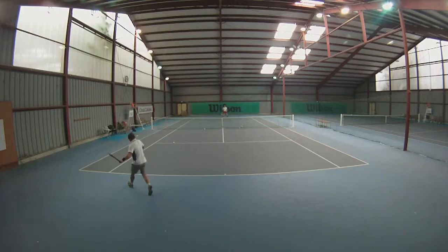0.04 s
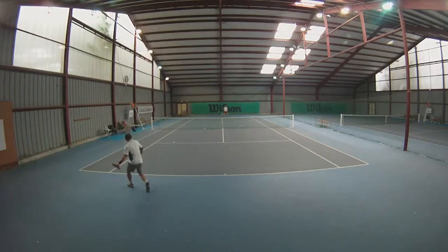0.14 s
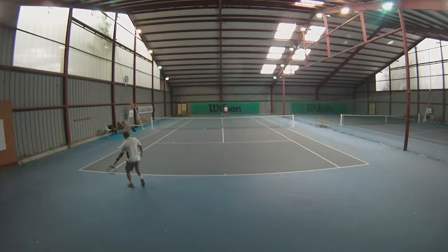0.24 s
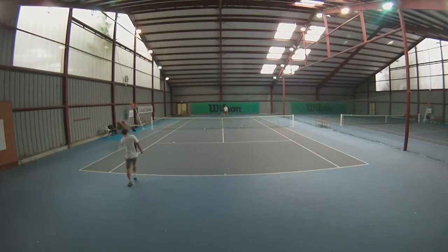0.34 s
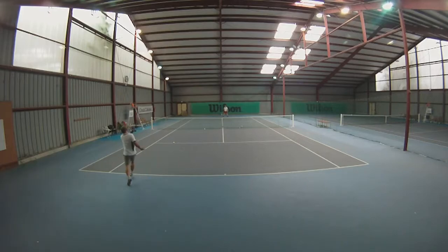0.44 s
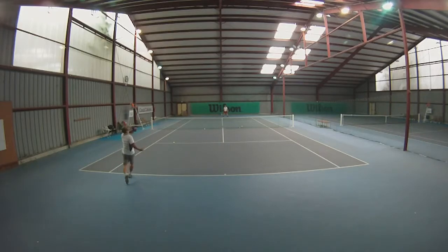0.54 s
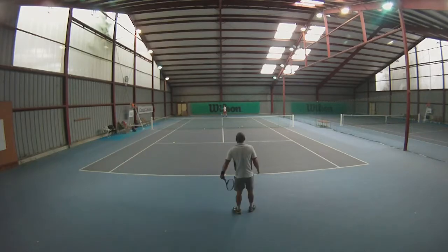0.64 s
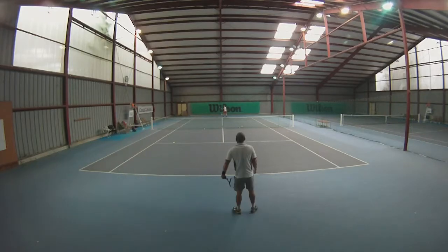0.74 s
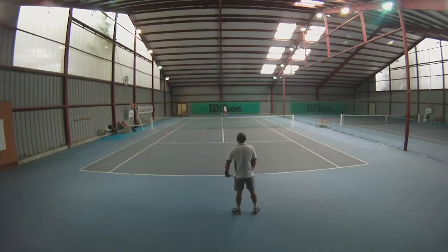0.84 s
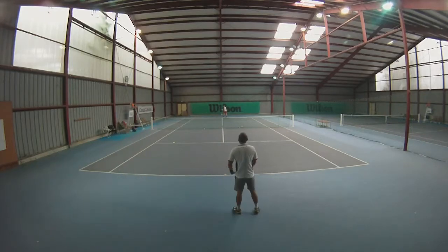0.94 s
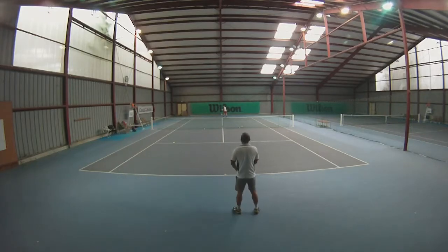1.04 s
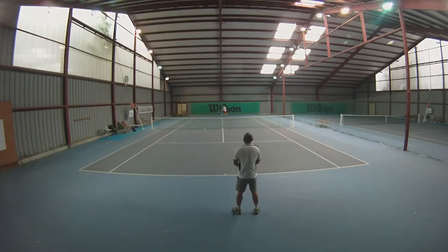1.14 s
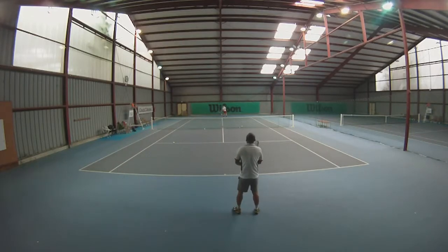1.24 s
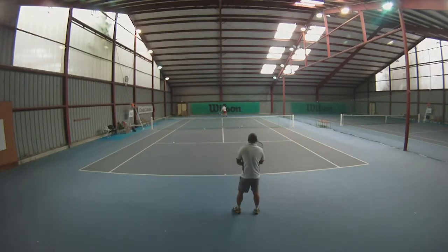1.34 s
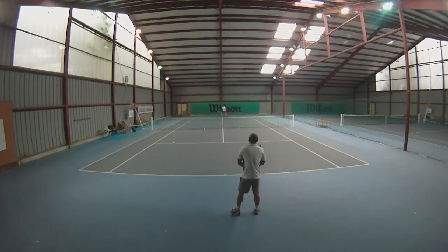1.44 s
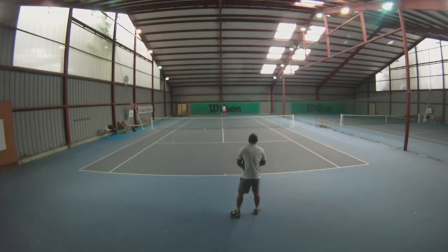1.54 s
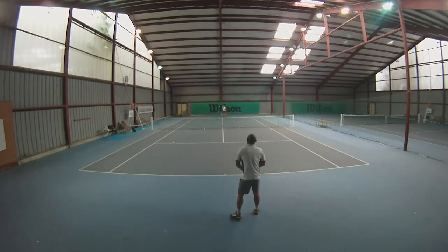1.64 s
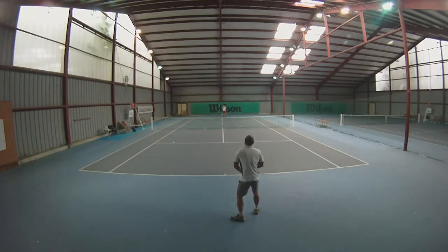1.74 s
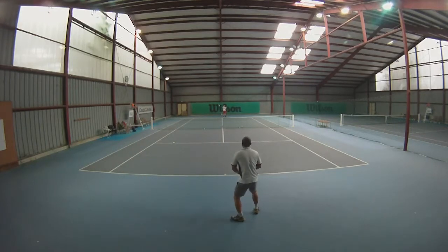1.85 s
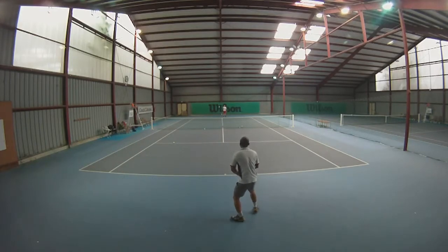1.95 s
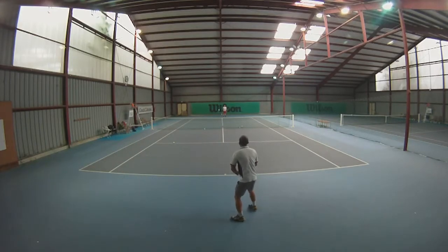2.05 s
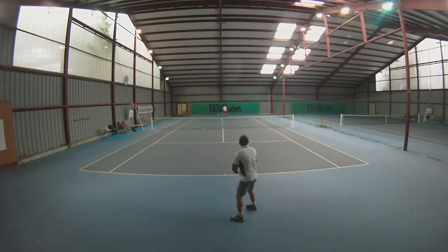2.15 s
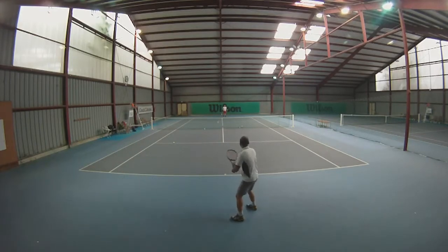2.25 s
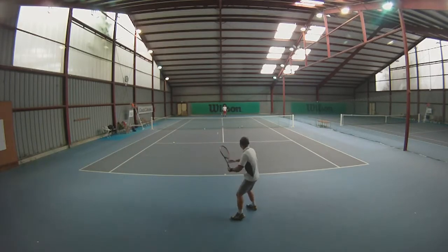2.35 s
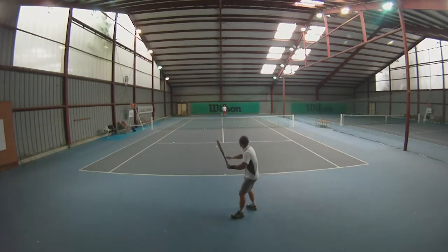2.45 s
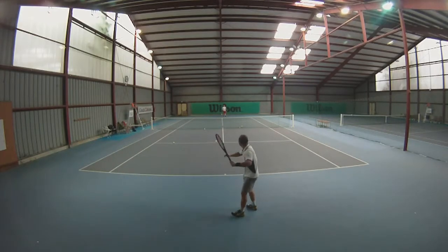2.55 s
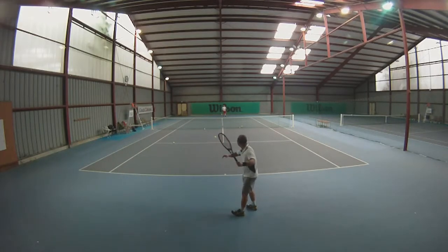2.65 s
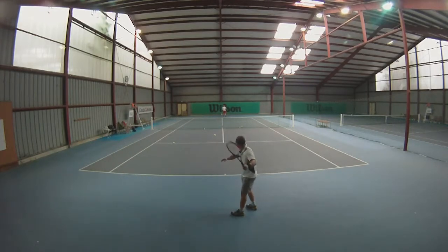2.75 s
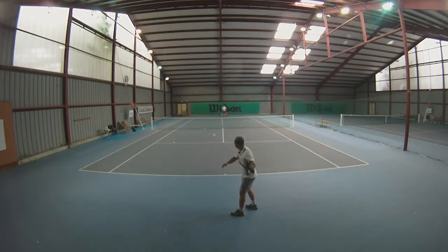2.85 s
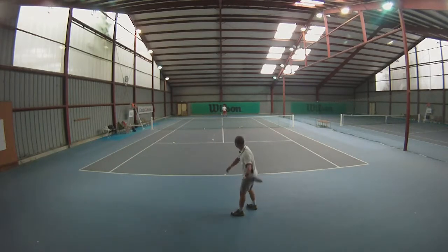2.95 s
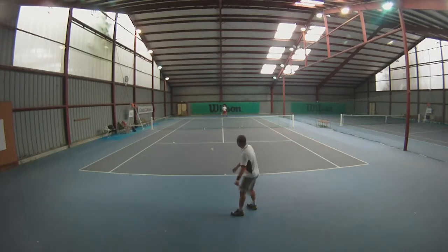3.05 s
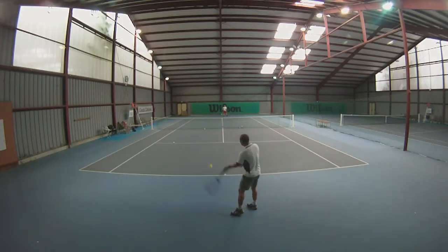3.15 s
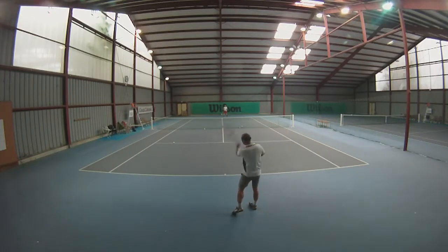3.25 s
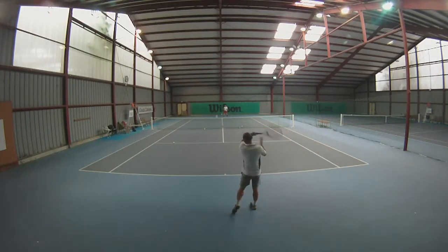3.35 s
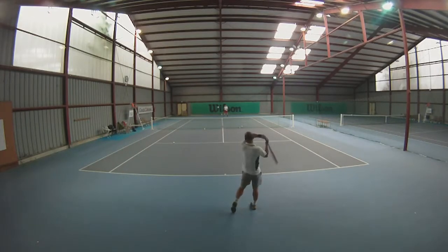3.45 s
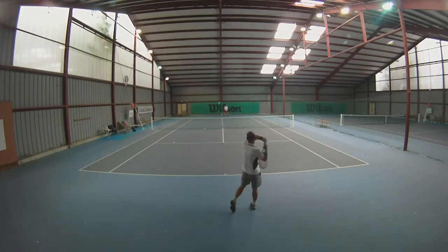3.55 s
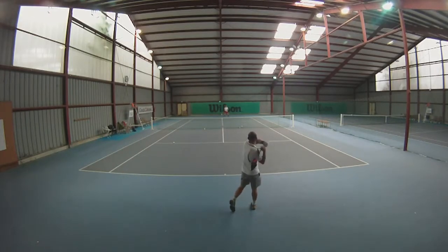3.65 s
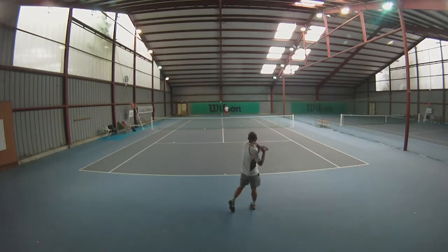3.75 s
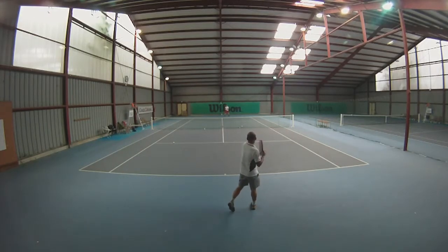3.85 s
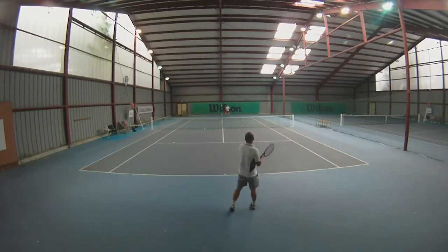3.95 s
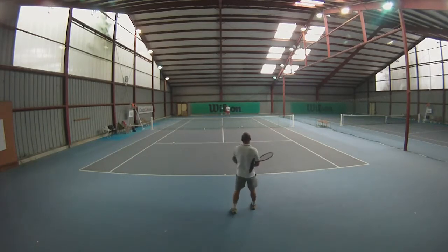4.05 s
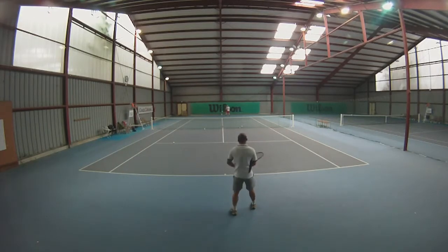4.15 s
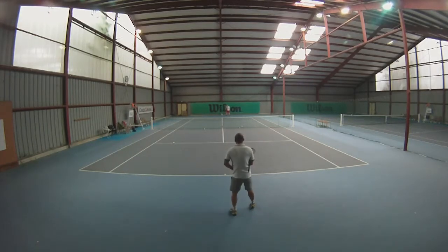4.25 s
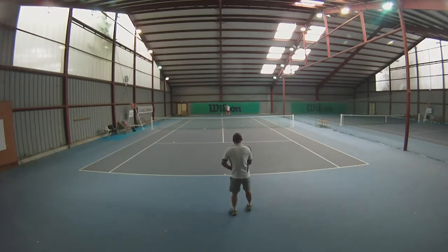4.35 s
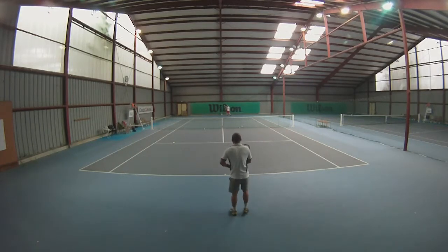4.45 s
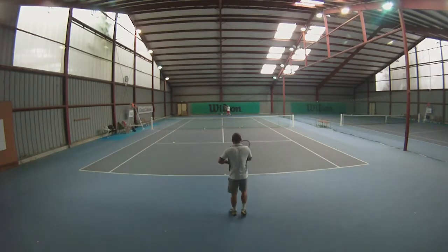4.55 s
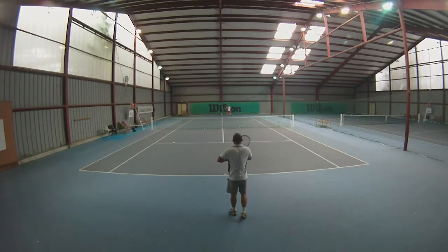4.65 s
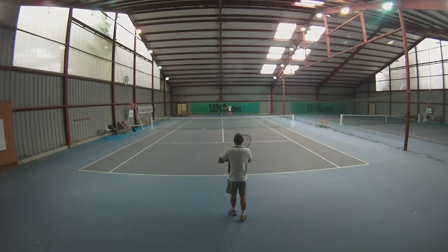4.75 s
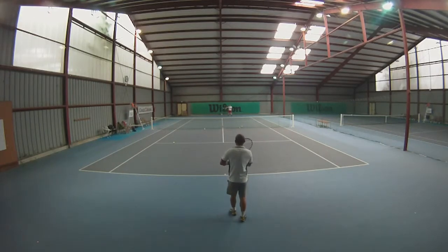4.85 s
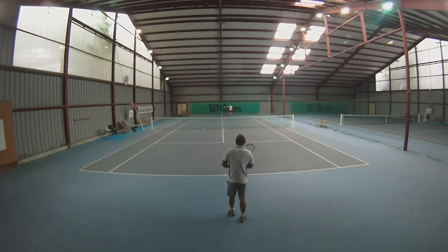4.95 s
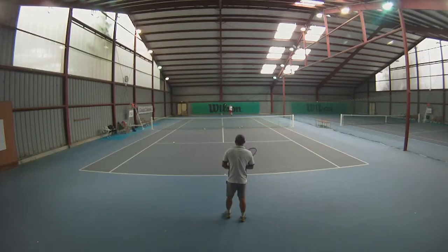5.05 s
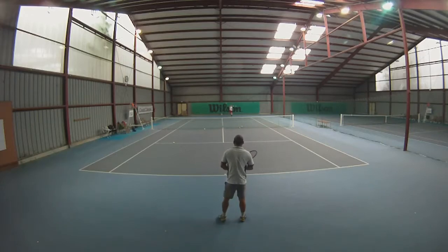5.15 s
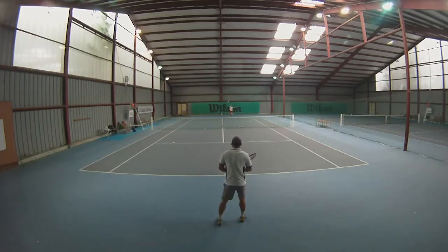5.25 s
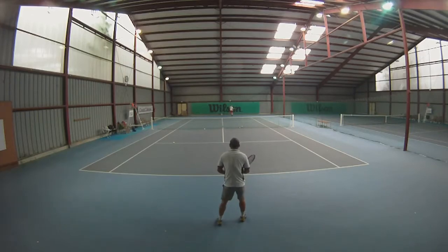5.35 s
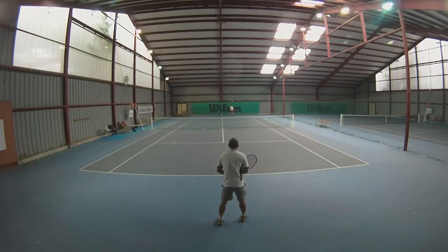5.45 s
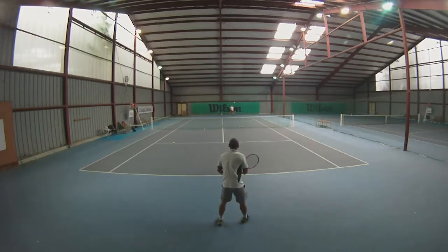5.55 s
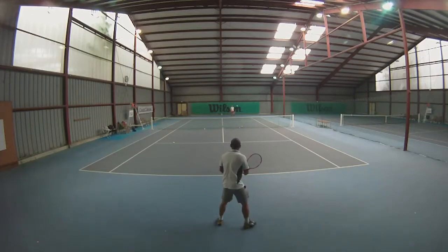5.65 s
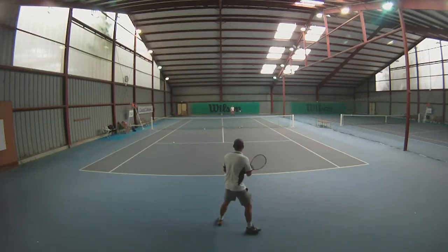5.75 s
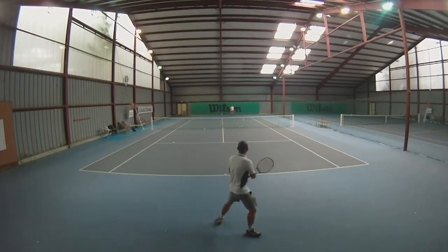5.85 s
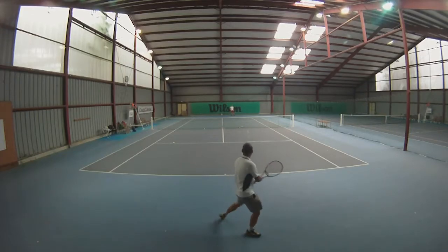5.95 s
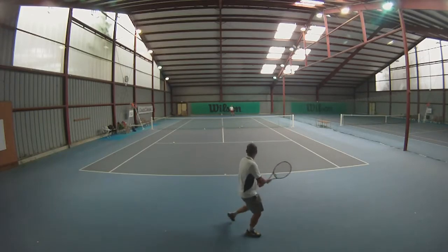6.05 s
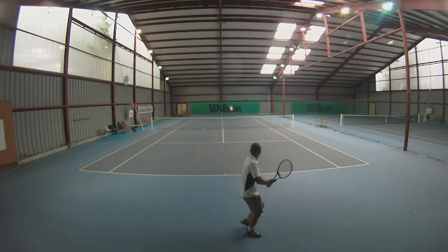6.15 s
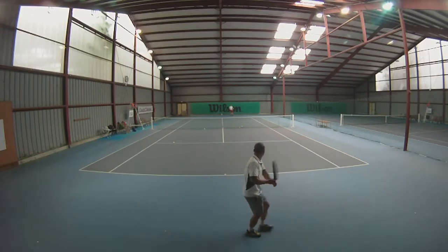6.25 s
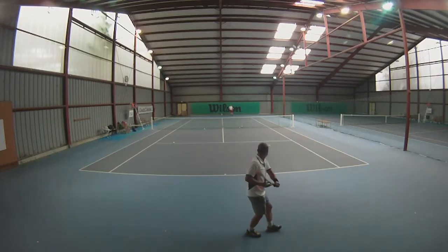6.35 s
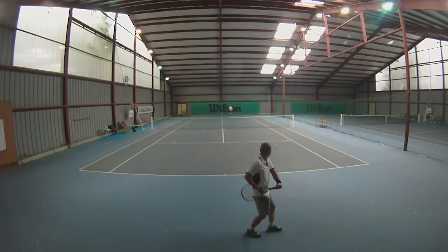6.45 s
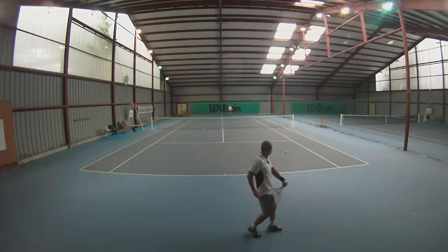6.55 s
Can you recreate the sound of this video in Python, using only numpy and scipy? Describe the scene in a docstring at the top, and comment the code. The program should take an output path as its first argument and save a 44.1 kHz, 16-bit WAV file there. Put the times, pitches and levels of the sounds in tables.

```python
"""Tennis in a steel-clad hall

Two rallies heard from behind the near baseline, one scene after the other; the first breaks off abruptly, tails
and all, as the scene changes. Balls and rackets are sets of fading tones with short bursts of noise; shoes are
shaped noise that taps and scuffs. Delayed copies make the echoes of ribbed walls, and fading noise makes the
hall ring for about three seconds. The nearly mono sound is sampled at 12 kHz and each sample is held, which
makes the treble gritty."""
import sys
import numpy as np
from scipy import signal
from scipy.fft import rfft, irfft, next_fast_len
from scipy.io import wavfile

SR = 44100
rng = np.random.default_rng(int(sys.argv[2]) if len(sys.argv) > 2 else 0)


def unload_wav(signal):
    """Save mono or channel-first audio to the path in sys.argv[1] as 16-bit WAV at rate SR, clipped to [-1, 1]."""
    wavfile.write(
        sys.argv[1],
        SR,
        np.round(np.clip(np.atleast_2d(signal).T, -1, 1) * 32767).astype(np.int16),
    )


N = 291060
TIME = np.arange(N) / SR
SHORT, LONG = TIME[:SR // 8], TIME[:3 * SR]  # time axes for hits (1/8 s) and for tails (3 s)
NET_M = 17  # anything farther away than this lies beyond the net

# echoes of the walls close by: lag/s, level/dB (a wall setting is added later)
CLOSE_WALLS = [(.0073, -24.5), (.012, -24.5), (.025, -21)]
# echoes of the walls round the far player: lag/s, level/dB (a wall setting is added later)
FAR_WALLS = [(0.0158, -4.5), (0.029, -1), (.089, -6.5)]
# tone colour of bounces and steps spread through the hall: f/Hz, relative level per Hz/dB
BOUNCE_COLOUR = [(60, -23), (180, 2), (300, 5), (450, -11), (720, -17), (1020, -8.5), (1550, -12),
                 (2200, -10.5), (2900, -14), (3600, -27.5), (6000, -43)]


def amp(db):
    """Turn decibels into a gain."""
    return 10 ** (np.asarray(db) / 20)


def unit(x):
    """Scale to an rms (average strength) of 1."""
    return x / np.sqrt(np.mean(x ** 2) + 1e-20)


def along(points, hz):
    """Read between (Hz, value) points on a logarithmic pitch axis."""
    f, v = np.transpose(points)
    return np.interp(np.log(hz + 1), np.log(f + 1), v)


def fade(t, t60):
    """Die away steadily, by 60 dB in t60 seconds."""
    return np.exp(-np.log(1000) * t / t60)


def filtered(x, response):
    """Multiply each frequency of x by the response there."""
    size = next_fast_len(x.shape[-1] + 8192)  # room for the filter to ring out
    hz = np.fft.rfftfreq(size, 1 / SR)
    return irfft(rfft(x, size) * response(hz), size)[..., :x.shape[-1]]


def dulled(x, edge_hz):
    """Remove the treble above an edge, as a low-pass that never sounds ahead of its input."""
    return signal.sosfilt(signal.butter(4, edge_hz / (SR / 2), output="sos"), x)


def noise(t, response):
    """Make coloured noise of rms 1, as long as t."""
    return unit(filtered(rng.standard_normal(len(t)), response))


def band(centre_hz, width_hz):
    """Give the response of a resonance; width_hz is where it falls to half its height."""
    return lambda hz: 1 / (1 + ((hz - centre_hz) / width_hz * 2) ** 2)


def add(track, s, sound):
    """Mix a sound into a track at time s, dropping what lies outside."""
    start = round(s * SR)
    sound, start = sound[max(-start, 0):], max(start, 0)
    track[start:start + len(sound)] += sound[:max(len(track) - start, 0)]


def ring(modes):
    """Let an object vibrate in several fading tones, all struck together."""
    return sum(amp(db) * fade(SHORT, t60) * np.sin(2 * np.pi * hz * SHORT) for hz, db, t60 in modes)


def crack(t60):
    """A surface is slapped: a short burst of coloured noise."""
    # colour of the slap: f/Hz, relative level per Hz/dB
    crack_colour = [(100, 15), (800, 14), (2600, 3.5), (3700, -24), (4700, -5), (6000, -56)]
    return noise(SHORT, lambda hz: amp(along(crack_colour, hz))) * fade(SHORT, t60)


def echoes(sound, walls, walls_db, rib_hz=230):
    """Direct sound and its echoes; ribbed sheet steel throws back little bass."""
    thin = filtered(sound, lambda hz: 1j * hz / (rib_hz + 1j * hz))
    out = np.zeros(len(LONG))
    add(out, 0, sound)
    for lag, db in walls:
        add(out, lag, amp(db + walls_db) * thin)
    return out


def hall(colour, early_db, late_db, tilt_db, early_t60=0.16, build_s=0.026, surge_s=0.013):
    """Sound scattered all over the hall: a quick early cloud, then a long surging tail."""
    # surges of scattered sound from roof and gables: lag/s, level in the bass/dB
    surges = [(.115, -1.5), (0.201, 0), (.25, 4), (.42, 2.5)]
    # how long the hall rings at each pitch: f/Hz, t60/s
    hall_decay = [(100, 2.03), (300, 2.79), (900, 2.47), (2000, 3.21), (3000, 4.4), (5000, 2.77)]

    def tilted(hz):
        tilt = tilt_db * np.log2((hz + 50) / 500)  # dB per octave, gentler in the deep bass
        return amp(along(colour, hz) + tilt)

    # split the noise into short slices, so that every pitch can fade at its own pace
    hz, t, slices = signal.stft(noise(LONG, tilted), SR, nperseg=512)
    surge_db = sum(db * np.exp(-((t - lag) / surge_s) ** 2) for lag, db in surges)
    # surges are strongest in the bass; the treble is scattered evenly
    surge_db = surge_db / (1 + (hz[:, None] / 1500) ** 2)
    decay = fade(t, along(hall_decay, hz)[:, None])
    tail = signal.istft(slices * amp(surge_db) * decay, SR, nperseg=512)[1][:len(LONG)]
    level = np.hypot(amp(late_db), amp(early_db) * fade(LONG, early_t60))
    return tail * level * (1 - np.exp(-LONG / build_s))


def air(rumble_db=-50, hum_hz=100, hum_db=-58):
    """The quiet hall: low rumble as coloured noise, and the hum of its lamps as a steady tone."""
    # colour of the quiet hall: f/Hz, relative level per Hz/dB
    air_colour = [(12, -14), (20, -18), (49, 0.5), (137, -8.5), (161, -14), (379, -19), (417, -22),
                  (469, -18.5), (654, -25.5), (1430, -32.5), (2650, -32), (2990, -30.5), (3280, -36.5),
                  (5150, -39), (5800, -47.5), (7540, -83), (12800, -120)]
    rumble = amp(rumble_db) * noise(TIME, lambda hz: amp(along(air_colour, hz)))
    return rumble + amp(hum_db) * np.sin(2 * np.pi * hum_hz * TIME)


def bounces(thump_hz=265, thump_t60=0.028, thump_db=-2.5, felt_hz=3000,
            near_walls_db=11.0, far_walls_db=2.0, early_db=-35, late_db=-43.5, boom_hz=150, boom_db=-21):
    """The hollow ball knocks on the hard court: its shell clicks, its body thumps and a low boom follows."""
    # ball bounces: t/s, distance/m, strength at 1 m/dB; one before 0 leaves only its tail
    landings = [(-0.3, 7.5, -3), (2.5433, 7.1, -3.5), (4.5084, 28, -1), (6.1831, 5.6, -1)]
    # tones of the ball's shell on the court: f/Hz, level/dB, t60/s
    shell = [(1066, -17.5, 0.052), (1280, -6.5, 0.011), (1840, -2.5, 0.0027), (2600, -11.5, 0.0042)]
    for s, metres, db in landings:
        thump = amp(thump_db) * np.cos(2 * np.pi * thump_hz * SHORT)
        thump = thump * fade(SHORT, thump_t60) * (1 - fade(SHORT, 0.0036))
        knock = dulled(ring(shell) + thump, felt_hz) + amp(-14) * crack(t60=0.026)
        if metres > NET_M:
            sound = echoes(knock, FAR_WALLS, far_walls_db)
        else:
            sound = echoes(knock, CLOSE_WALLS, near_walls_db)
        boom = amp(boom_db) * noise(LONG, band(boom_hz, width_hz=160))
        boom = boom * fade(LONG, 0.37) * (1 - fade(LONG, 0.067))
        answer = hall(BOUNCE_COLOUR, early_db, late_db, tilt_db=0, early_t60=0.19, build_s=0.009)
        # direct sound weakens with distance; the hall's answer depends on strength alone
        yield s, amp(db) * ((sound + boom) / metres + answer)


def steps(thud_hz=340, early_db=-12, late_db=-20):
    """A shoe lands with a soft thud and a slap of noise; the hall's answer follows the thud's strength."""
    # footfalls, levels before the fades: t/s, thud level/dB, slap level/dB
    footfalls = [(0.100, -34.5, -51), (2.395, -42, -58), (2.8, -31.5, -50), (4.665, -37, -40),
                 (6.477, -34, -37.5)]
    for s, thud_db, slap_db in footfalls:
        thud = noise(SHORT, band(thud_hz, width_hz=250)) * fade(SHORT, 0.035) * (1 - fade(SHORT, 0.012))
        sound = hall(BOUNCE_COLOUR, thud_db + early_db, thud_db + late_db, tilt_db=0.5)
        add(sound, 0, amp(thud_db) * thud + amp(slap_db) * crack(t60=0.021))
        yield s, sound


def scuffs(width_share=0.3):
    """Rubber soles chirp and hiss as they slide; the higher the chirp, the wider its band of noise."""
    # soles rubbing the court: middle t/s, swell time each side/s, f/Hz, peak level/dB
    rubs = [(0.259, 0.089, 4400, -64.5), (0.388, 0.026, 2650, -57), (0.923, 0.024, 2770, -56.5),
            (1.814, 0.063, 4300, -61.5), (5.286, 0.011, 2800, -34.5), (6.417, 0.018, 5030, -60)]
    for s, length, hz, db in rubs:
        swell = np.exp(-((LONG - 2 * length) / length) ** 2)
        yield s - 2 * length, amp(db) * swell * noise(LONG, band(hz, width_share * hz))


def strokes(pop_hz=420, dwell_s=0.00321, pop_width_s=0.0021, ping_t60=2.75, near_hz=6500, far_hz=3000,
            near_ratio=1.06, far_ratio=0.98, near_walls_db=-7.0, far_walls_db=0.8, hall_db=-40):
    """The ball sinks into the strings and is thrown out: one pop, then strings and frame ring."""
    # racket strokes: t/s, distance/m, strength at 1 m/dB, off centre/0-1,
    # early cloud over the tail/dB, ping f/Hz, ping over strength/dB
    swings = [(0.413, 11.8, 12.5, 0.77, 7, 2700, -68), (1.5287, 23.7, 4, 0.07, 4.5, 3250, -62),
              (3.2613, 4.07, 12.5, 0, -14, 2740, -63), (5.0799, 23.6, 11.5, 0.54, 0, 2030, -47.5)]
    # tones of strings and frame: f/Hz, level struck in the centre/dB, level struck off centre/dB, t60/s
    racket = [(292, -28, 2, 0.04), (425, -17, -10, 0.046), (565, -9.5, -1.5, 0.033),
              (702, -24, -2.5, 0.074), (882, -9, -3, 0.039), (1364, -19.5, -16, 0.03),
              (1593, -41, -11, 0.14), (2030, -34, -24, 0.028), (2344, -17, -9, 0.036),
              (2467, -51, -4.5, 0.029), (2913, -17.5, -33, 0.025), (3090, -19, -39, 0.021),
              (4480, -26, -11.5, 0.015)]
    # echoes of the far wall for the near player: lag/s, level/dB (a wall setting is added below)
    late_walls = [(.038, -30), (.19, -14.5), (.245, -18), (0.408, -21)]
    # tone colour of strokes spread through the hall: f/Hz, relative level per Hz/dB
    stroke_colour = [(50, -17), (130, -10), (230, 0), (320, 4), (400, -2.5), (520, -4.5), (710, -18.5),
                     (890, -6), (1030, -12), (1200, -19.5), (2000, -20.5), (2850, -20), (3600, -32.5),
                     (4750, -31.5), (6000, -47.5)]
    court_lag_s, court_graze_m = 0.00363, 20  # the court's echo: lag, and distance where it is half as strong
    # a clean stroke's felt crack and the tilt of its tail per octave
    crack_db, clean_tilt_db = -15, 0.03
    # added at the edge of the strings: a higher pop, a harder crack and a brighter tail
    off_pitch_rise, off_crack_db, off_tilt_db = 0.22, 11, 1.07
    for s, metres, db, off, cloud_db, ping_hz, ping_db in swings:
        # each player has a racket of their own and other walls around them
        if metres > NET_M:
            ratio, edge_hz, walls, walls_db = far_ratio, far_hz, FAR_WALLS, far_walls_db
        else:
            ratio, edge_hz, walls, walls_db = near_ratio, near_hz, CLOSE_WALLS + late_walls, near_walls_db
        pitch_hz = pop_hz * ratio * (1 + off_pitch_rise * off)
        since_pop = SHORT - dwell_s
        pop = np.exp(-(since_pop / pop_width_s) ** 2) * np.cos(2 * np.pi * pitch_hz * since_pop)
        # an off-centre contact wakes other tones than a clean one
        strings = ring([(hz, np.interp(off, [0, 1], [centre_db, edge_db]), t60)
                        for hz, centre_db, edge_db, t60 in racket])
        felt = amp(crack_db + off_crack_db * off) * crack(t60=0.042)
        # the force builds up as the ball is squeezed
        contact = pop + (strings + felt) * (1 - fade(SHORT, 0.0064))
        hit = dulled(amp(db) / metres * contact, edge_hz)
        sound = echoes(hit, walls, walls_db)
        add(sound, court_lag_s, metres / (metres + court_graze_m) * hit)
        # the racket's ping lingers in the hall as a narrow, wavering band of noise
        ping = amp(db + ping_db) * noise(LONG, band(ping_hz, width_hz=173))
        ping = ping * fade(LONG, ping_t60) * (1 - fade(LONG, 0.09))
        late_db = db + hall_db
        tilt_db = clean_tilt_db + off_tilt_db * off
        answer = hall(stroke_colour, late_db + cloud_db, late_db, tilt_db, early_t60=0.34, build_s=0.0038)
        yield s, sound + ping + answer


def widen(mono):
    """Make two nearly alike channels by adding a scattered copy to one and taking it from the other."""
    # gain of the scattered difference between the channels: f/Hz, level/dB
    width = [(100, -36.5), (450, -44), (1000, -45), (2500, -31), (4500, -48)]
    scatter = rng.standard_normal(len(SHORT)) * fade(SHORT, 0.046)
    side = signal.fftconvolve(mono, scatter / np.linalg.norm(scatter))[:N]
    side = filtered(side, lambda hz: amp(along(width, hz)))
    side = side + amp(-73) * unit(rng.standard_normal(N))  # faint hiss
    return np.array([mono + side, mono - side])


def scene(break_s=0.629):
    """Play two rallies as two scenes; at the break the scene changes and the first stops dead, while the air
    sounds throughout."""
    first, second = np.zeros(N), np.zeros(N)
    for s, sound in [*bounces(), *steps(), *scuffs(), *strokes()]:
        add(first if s < break_s else second, s, sound)
    cut = np.clip((break_s - TIME) / 0.004, 0, 1)  # closes within 4 ms
    return widen(first * cut + second + air())


def record(dry, hold_hz=12000, top_hz=15400):
    """Holding each sample mirrors the sound round the sampling rate, which gives a gritty treble."""
    sampled = filtered(np.clip(dry, -1, 1), lambda hz: hz < hold_hz / 2)
    mirrored = sampled * (1 + 2 * np.cos(2 * np.pi * hold_hz * TIME))
    # a held sample weakens the treble by a sinc curve; nothing passes above the top
    return filtered(mirrored, lambda hz: np.sinc(hz / hold_hz) * (hz < top_hz))


dry = scene()
out = record(dry)
unload_wav(out)
```